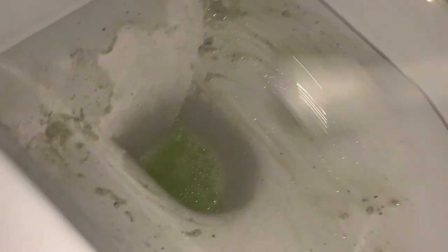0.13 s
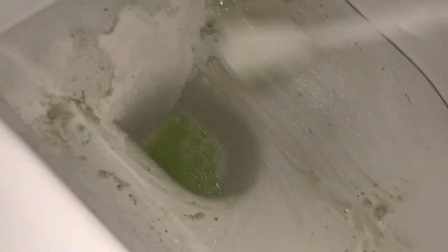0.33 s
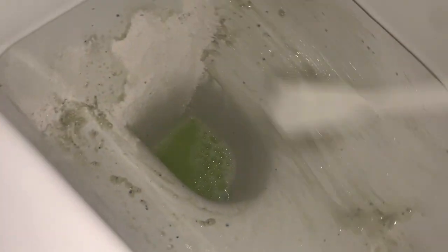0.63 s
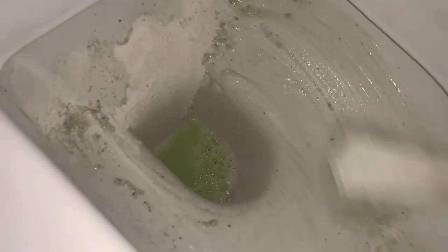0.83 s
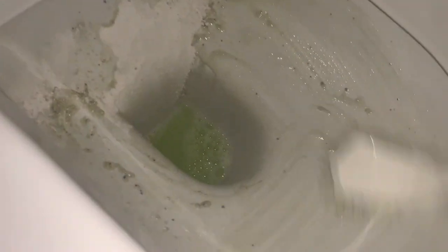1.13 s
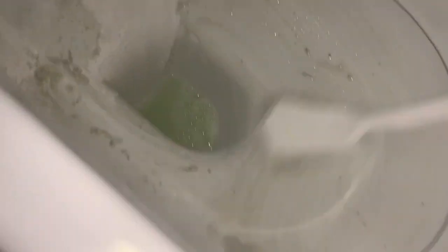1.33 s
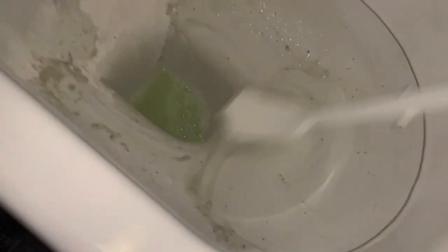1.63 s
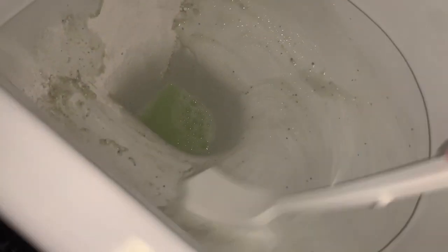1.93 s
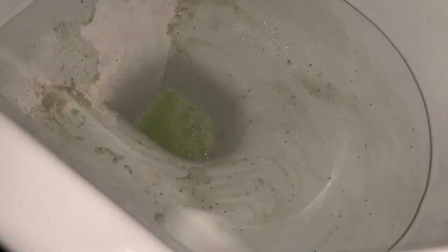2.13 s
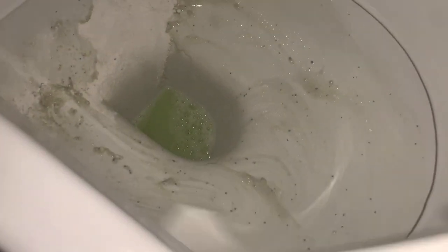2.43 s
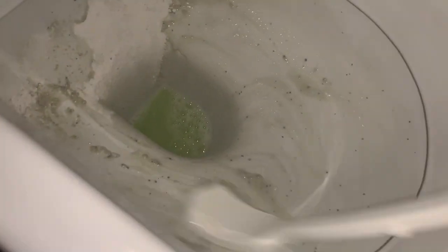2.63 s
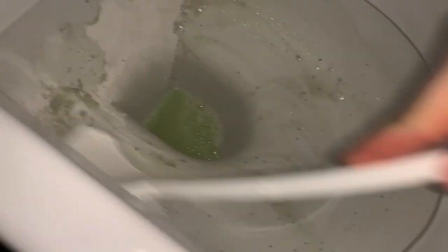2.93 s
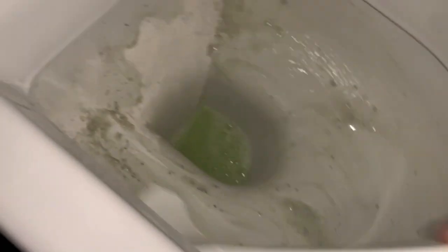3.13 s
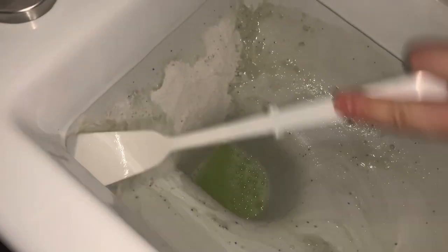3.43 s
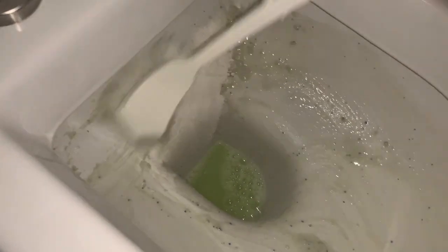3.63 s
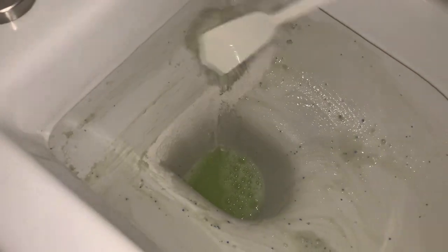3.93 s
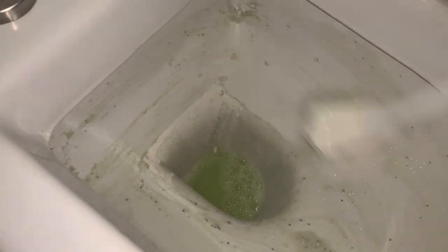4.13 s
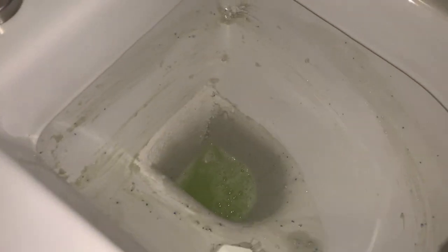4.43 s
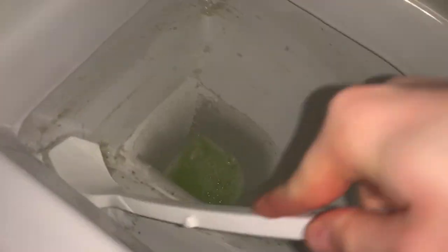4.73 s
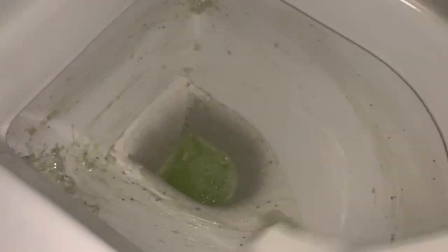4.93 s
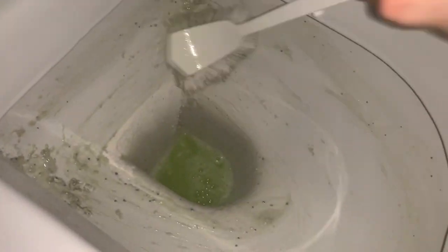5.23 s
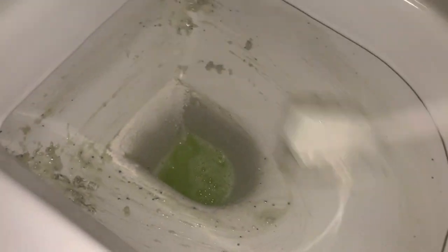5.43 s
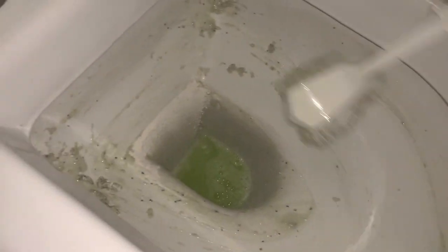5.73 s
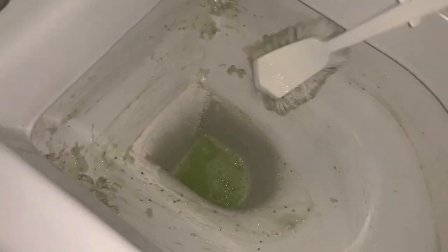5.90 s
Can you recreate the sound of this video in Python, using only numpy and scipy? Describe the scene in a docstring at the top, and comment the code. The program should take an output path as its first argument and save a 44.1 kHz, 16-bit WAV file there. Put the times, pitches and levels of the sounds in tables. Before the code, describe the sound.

Close, bright bristle strokes rasp over powdery porcelain, brisk at first, then softer and slower, with hollow bowl resonance and sharp plastic knocks.

```python
"""In a wet, powdered toilet bowl a stiff plastic brush scrubs back and forth, close to a two-port microphone.
Bristle tips hiss over the glaze and grit scrapes under them: both are streams of tiny random clicks.
The hollow of the bowl drones along as a set of ringing air modes. Now and then the brush head knocks
or bumps the porcelain (short rings and soft pushes), and it squeaks on the glaze (gliding tones).
Reflections in the bowl and a tiled room surround the brush, over a low rumble."""
import sys
import numpy as np
from scipy import signal
from scipy.fft import rfft, irfft, next_fast_len
from scipy.io import wavfile

SR = 44100
rng = np.random.default_rng(int(sys.argv[2]) if len(sys.argv) > 2 else 0)


def file_out(sig):
    """Save sig as 16-bit WAV at sys.argv[1]."""
    # one column per channel
    cols = np.atleast_2d(sig).T
    # limit, then scale
    lim = np.clip(cols, -1, 1)
    pcm = np.round(lim * 32767).astype(np.int16)
    wavfile.write(sys.argv[1], SR, pcm)


N = 267466
TIME = np.arange(N) / SR  # seconds

# how the sound of scraped grit is spread over pitch: [f/Hz, relative level/dB]
GRIT_SPECTRUM = [(480, -24.5), (800, -15.5), (1300, -7), (1900, -2.5), (3000, -3), (4200, 0), (5600, -2.5),
                 (7500, -1), (15500, -5)]


def amp(db):
    """Turns decibels into a factor."""
    return 10 ** (np.asarray(db) / 20)


def unit(x):
    """Scales a sound to rms 1."""
    return x / np.sqrt(np.mean(x ** 2) + 1e-20)


def read(points, hz):
    """Reads a table of (f/Hz, value), joined by straight lines in log frequency."""
    f, value = np.transpose(points)
    return np.interp(np.log(hz + 1), np.log(f), value)


def curve(rows, axis):
    """One column of a table at every sample; column 0 is the time in seconds."""
    rows = np.array(rows)
    return np.interp(TIME, rows[:, 0], rows[:, axis])


def add(mix, s, sound):
    """Adds a short sound to the mix, starting at s seconds."""
    part = mix[round(s * SR):][:len(sound)]
    part += sound[:len(part)]


def colour(x, spectrum):
    """Filters x by a spectrum, then scales it to rms 1."""
    gain = amp(read(spectrum, np.fft.rfftfreq(N, 1 / SR)))
    return unit(irfft(rfft(x) * gain, N))


def wander(hz):
    """A smooth random curve of rms 1 that moves mostly slower than hz."""
    count = 8 * int(hz * N / SR)
    smooth = signal.lfilter(*signal.butter(2, 1 / 4), rng.standard_normal(count))
    return unit(np.interp(TIME, np.linspace(0, N / SR, count), smooth))


def slips(per_s, spread_db):
    """Tiny random clicks of uneven size, at rms 1."""
    size = amp(spread_db * np.minimum(rng.exponential(1, N), 4))
    sign = rng.choice([-1, 1], N)
    happens = rng.random(N) < per_s / SR
    return unit(size * sign * happens)


def ring(modes, t):
    """Dying sines, one row a mode; a mode falls by 60 dB in its t60."""
    return np.array([amp(db - 60 * t / t60) * np.sin(2 * np.pi * hz * t) for hz, t60, db in modes])


def room_tone(level_db=-64, sway_db=4.0):
    """A low, uneven rumble in the room, made of filtered noise."""
    # spectrum of the rumble: [f/Hz, relative level/dB]
    rumble_spectrum = [(24, -56), (45, -9), (70, -7), (110, -23.5), (290, -22), (540, -31.5), (900, -38),
                       (15000, -32.5)]
    rumble = colour(rng.standard_normal(N), rumble_spectrum)
    return rumble * amp(level_db + sway_db * wander(hz=20))


def echoes(t60s):
    """Sparse reflections of random sign, each band dying at its own speed from equal energy per band."""
    taps = rng.choice([-1., 1.], SR // 2) * (rng.random(SR // 2) < 1 / 8)
    hz, t, bands = signal.stft(taps, SR, nperseg=128)
    fade = amp(-60 * t / read(t60s, hz)[:, None])
    fade /= np.linalg.norm(fade, axis=1, keepdims=True)
    tail = signal.istft(bands * fade, SR, nperseg=128)[1]
    return tail / np.linalg.norm(tail)


def reflections(x, t60s, count):
    """The brush keeps moving, so its sound shifts between several sets of reflections."""
    share = np.array([wander(hz=22) for _ in range(count)])
    share /= np.linalg.norm(share, axis=0)
    return sum(signal.oaconvolve(x * part, echoes(t60s))[:N] for part in share)


def space(x, bowl_t60=0.098, room_db=-14, lead_s=0.000208, lead_from_hz=6250):
    """Direct sound, quick reflections round the bowl and a tiled room; in the treble the right port leads."""
    # how long the tiled room rings: [f/Hz, t60/s]
    room_t60 = [(300, 1), (6000, 0.088), (15000, 0.046)]
    # share of the sound that comes straight to the ports: [f/Hz, share from 0 to 1]
    direct_share = [(120, .78), (280, .88), (500, .7), (1000, .72), (2500, .45), (5200, .36), (6800, .8),
                    (8500, .97), (15000, .955)]
    size = next_fast_len(N + SR // 10)
    hz = np.fft.rfftfreq(size, 1 / SR)
    direct = np.clip(read(direct_share, hz), 0, 1)
    lead = np.exp(2j * np.pi * lead_s * np.maximum(hz - lead_from_hz, 0))
    heard = x + amp(room_db) * reflections(x, room_t60, count=2)
    straight = direct * rfft(heard, size)
    out = []
    for port_shift in (1, lead):  # left, right
        bowl = reflections(heard, [(1, bowl_t60)], count=5)
        scattered = np.sqrt(1 - direct ** 2) * rfft(bowl, size)
        out.append(irfft(straight * port_shift + scattered, size)[:N])
    return np.array(out)


def hollow(x):
    """The air in the bowl rings when x stirs it."""
    # air modes of the bowl: [f/Hz, t60/s, relative height of the resonance/dB]
    air_modes = [(77.5, 0.16, 9.5), (183, 0.38, 5), (297.6, 1, 5), (408, 0.45, 6), (682, 0.16, -15),
                 (826, 0.048, 10.5), (970, 0.066, 4), (1161, 0.039, 9), (1535, 0.015, 3.5),
                 (1808, 0.037, 8.5)]
    t = np.arange(SR // 2) / SR
    # a long ring builds up higher, so divide by t60 to get the listed heights
    response = (ring(air_modes, t) / np.array(air_modes)[:, 1:2]).sum(0)
    return signal.fftconvolve(x, response / abs(rfft(response)).max())[:N]


def squeaks(jitter=.022, second_db=-1, third_db=-7, grip_db=-35, chatter_hz=150, chatter_db=2.8):
    """Fast, unsteady stick-slip on the glaze: a gliding, chattering tone with two overtones."""
    # one table for each squeak: [t/s, f/Hz, level/dB]
    glides = [
        [(2.105, 985, -50), (2.13, 970, -42), (2.17, 955, -55)],
        [(3.59, 1980, -47), (3.645, 1945, -42), (3.675, 1880, -47)],
        [(4.416, 3400, -40), (4.431, 3250, -36), (4.452, 4300, -32), (4.467, 3600, -35), (4.479, 5500, -35),
         (4.485, 4700, -48)],
        [(4.465, 3300, -45), (4.476, 3700, -40), (4.492, 4400, -48)],
    ]
    out = np.zeros(N)
    for rows in glides:
        level_db = curve(rows, axis=2)
        # a harder grip lets go more sharply and less evenly; it is full from grip_db up
        grip = np.minimum(amp(level_db - grip_db), 1)
        pitch_hz = curve(rows, axis=1) * (1 + jitter * grip * wander(hz=902))
        turn = 2 * np.pi * np.cumsum(pitch_hz) / SR
        overtones = amp(second_db) * np.sin(2 * turn) + amp(third_db) * np.sin(3 * turn)
        tone = np.sin(turn) + grip * overtones
        sliding = (TIME > rows[0][0]) & (TIME < rows[-1][0])
        # a hard squeak catches and lets go in quick bursts
        burst_hz = chatter_hz * (1 + .1 * wander(hz=60))
        chatter = np.sin(2 * np.pi * np.cumsum(burst_hz) / SR) - .5
        out += tone * sliding * amp(level_db + chatter_db * grip * chatter + 0.57 * wander(hz=198.5))
    return out


def drag(start_s=3.27, length_s=0.27, pitch_hz=1840, width_hz=210, level_db=-51):
    """A slow drag that nearly squeaks: the bristles slip almost in step, a fuzzy band of tone."""
    resonance = signal.iirpeak(pitch_hz, pitch_hz / width_hz, fs=SR)
    fuzz = signal.lfilter(*resonance, rng.standard_normal(N))
    swell = np.sin(np.pi * np.clip((TIME - start_s) / length_s, 0, 1))
    return unit(fuzz) * np.sqrt(abs(swell)) * amp(level_db)


def bumps(cycles=.7, shortest_s=.004, rattle_db=-11, rattle_s=.04):
    """Bristles bottom out: a soft push with a quickly dying shudder under it; both set the hollow booming."""
    # the soft bumps: [t/s, level/dB, f of the push/Hz]
    bump_list = [(0.213, -42, 440), (1.208, -48, 92), (1.472, -43, 668), (1.489, -54, 74.5),
                 (1.657, -49, 67), (1.795, -48.5, 668), (2.107, -47, 690), (2.1286, -52, 178),
                 (2.18, -51, 178), (3.31, -54, 178), (3.772, -40, 277), (3.785, -44, 71), (4.624, -43, 930),
                 (4.629, -40, 300), (4.636, -39, 177), (4.667, -45, 185), (4.690, -43.5, 82),
                 (6.008, -39, 390), (6.012, -46, 180)]
    out, t = np.zeros(N), np.arange(SR // 5) / SR
    for s, db, hz in bump_list:
        u = t / max(cycles / hz, shortest_s)  # 1 at the peak of the push
        push = u * np.exp(1 - u) * np.sin(2 * np.pi * hz * t)
        # the shudder is noise one octave wide
        band = signal.butter(2, [hz / np.sqrt(2), hz * np.sqrt(2)], "band", fs=SR, output="sos")
        shudder = unit(signal.sosfilt(band, rng.standard_normal(len(t)))) * np.exp(-t / rattle_s)
        add(out, s, amp(db) * (push + amp(rattle_db) * shudder))
    return out + hollow(out)


def knocks(crack_s=0.0017, crack_db=-3, ring_db=-13, low_share=0.17, tick_db=6.5, tick_hz=5600,
           tick_s=0.000096):
    """Hard plastic on porcelain: tick, crack and short ring, lower and duller if the bristles cushion it."""
    # the head knocks on the bowl: [t/s, level/dB, brightness as upper limit f/Hz]
    knock_list = [(0.2088, -15.5, 10500), (1.2105, -26, 7000), (1.4352, -22.5, 7000), (2.1067, -25, 1410),
                  (3.7682, -18, 6000), (4.627, -23, 1300), (5.066, -27, 10000), (5.762, -29.5, 1290),
                  (6.004, -17, 3000), (6.0094, -13, 1250), (6.046, -25, 5500)]
    # ring of the brush head on porcelain: [f/Hz, t60/s, relative level/dB]
    head_modes = [(658, 0.057, -7), (976, 0.058, -8), (1900, 0.013, -2.5), (2663, 0.045, -1.5),
                  (3255, 0.015, 5), (4530, 0.017, -3), (6050, 0.011, -44), (6740, 0.011, -2)]
    out, t = np.zeros(N), np.arange(SR // 5) / SR
    tick = t / tick_s * np.exp(1 - t / tick_s) * np.sin(2 * np.pi * tick_hz * t)
    head_ring = ring(head_modes, t).sum(0)
    for s, db, bright_hz in knock_list:
        crack = rng.choice([-1, 1], len(t)) * np.exp(-t / crack_s)
        blow = amp(tick_db) * tick + amp(crack_db) * crack + amp(ring_db) * head_ring
        cushioned = signal.lfilter(*signal.butter(2, min(bright_hz, SR / 3), fs=SR), blow)
        low_cut = signal.butter(1, low_share * bright_hz, "high", fs=SR)
        add(out, s, amp(db) * signal.lfilter(*low_cut, cushioned))
    return out


def stroking(layer):
    """Level of one layer ("hiss", "grit" or "stir") as the strokes follow one another."""
    # one row for each push or pull: [start t/s, length/s, bristle hiss level/dB, grit scrape level/dB,
    # stir of the bowl's hollow level/dB, lean/dB = how much harder the hand presses at the end than the start]
    strokes = [(-0.078, 0.15, -24.5, -34, -48.5, 5.5), (0.031, 0.19, -27, -42, -53, 7),
               (0.186, 0.21, -25.0, -33.5, -49, -5), (0.367, 0.19, -24.5, -35.5, -55, -2),
               (0.521, 0.21, -26, -33, -51.5, -2.5), (0.686, 0.34, -26, -36.5, -53, 12.5),
               (0.966, 0.15, -27.5, -35, -52, -4), (1.059, 0.18, -24.5, -41.5, -66, -11),
               (1.136, 0.35, -31.5, -35.5, -58.5, -19.5), (1.379, 0.22, -26.5, -33, -52.5, 9),
               (1.53, 0.33, -30, -36, -59, -14), (1.7, 0.21, -29.5, -35, -57, 18.5),
               (1.844, 0.26, -33.5, -36.5, -55, -8), (2.007, 0.14, -26.5, -35.5, -72, 24),
               (2.062, 0.2, -31.5, -35.5, -50, 2), (2.218, 0.17, -31.5, -35.5, -54, -7),
               (2.318, 0.23, -29.5, -34, -54.5, 9.5), (2.519, 0.21, -31.0, -35.5, -56.5, -13),
               (2.672, 0.23, -27.5, -32, -58.5, -1.5), (2.867, 0.21, -32, -39.5, -62, 0),
               (3.047, 0.24, -29.5, -34.5, -56, -5), (3.235, 0.34, -38.5, -43, -54, -10.5),
               (3.498, 0.33, -39, -43.5, -58.5, 14), (3.795, 0.24, -36, -43.0, -53, -13),
               (3.957, 0.27, -38.5, -47, -62, 7), (4.101, 0.3, -37.5, -41, -56.5, 7.5),
               (4.315, 0.28, -49, -46, -57.5, -15), (4.476, 0.18, -35.5, -43, -56.5, 10),
               (4.707, 0.48, -35, -42, -57, 7.5), (5.06, 0.22, -33.5, -44, -57, 12),
               (5.271, 0.29, -32.5, -42.5, -65, 0), (5.562, 0.32, -33, -38.5, -59, 3),
               (5.84, 0.27, -34.5, -43, -58, 18)]
    # each stroke gathers speed and brakes before the turn; in mid-stroke the hand is faster by arch_db
    speed_up_s, brake_s, arch_db = .104, .045, 6.5
    # how a layer follows the hand: level column, power of the speed, share of the lean, and
    # the level in dB at which the bent bristles still creep between strokes;
    # pressing feeds the grit and damps the hiss
    column, speed_power, lean_share, creep_db = {
        "hiss": (0, 1, -0.1, -53.5),
        "grit": (1, 0.65, 1, -57.5),
        "stir": (2, 0.31, 1, -72.5)}[layer]
    power = np.full(N, amp(creep_db) ** 2)
    for start, length, *layer_db, lean_db in strokes:
        inside = (TIME > start) & (TIME < start + length)
        t = TIME[inside] - start
        from_middle = t / length - .5
        ramps = np.minimum([t / speed_up_s, (length - t) / brake_s], 1)
        speed = np.prod(np.sin(np.pi / 2 * ramps) ** 2, axis=0)
        speed = speed * amp(-arch_db * (2 * from_middle) ** 2)
        press_db = lean_share * lean_db * from_middle
        power[inside] += (speed ** speed_power * amp(layer_db[column] + press_db)) ** 2
    return np.sqrt(power)


def flicks(level_db=-17):
    """A steady, sparse crackle of tiny snaps runs along with the scraping."""
    snaps = colour(slips(per_s=34, spread_db=4.5), GRIT_SPECTRUM)
    return snaps * stroking("grit") * amp(level_db)


def bites(peak_s=0.019):
    """At a turn the bristles flip over and bite into the powder: a coarse crunch swells and dies."""
    # the bites: [t/s, level/dB]
    bite_list = [(0.238, -30.5), (0.566, -30.5), (1.16, -39), (3.09, -34), (3.865, -43)]
    dig = np.zeros(N)
    u = np.arange(SR // 5) / SR / peak_s
    for s, db in bite_list:
        add(dig, s, amp(db) * u * np.exp(1 - u))
    return colour(slips(per_s=1800, spread_db=4.0), GRIT_SPECTRUM) * dig


def scrubbing():
    """Thousands of bristle tips slip each second; tufts catch together, and grit crunches under them."""
    # spectrum of the bristle hiss: [f/Hz, relative level/dB]
    hiss_spectrum = [(700, -71), (3000, -8.5), (5000, -12), (6500, -5), (8300, -1.5), (11000, 2.5),
                     (15500, 0.5)]
    tufts, patches = wander(hz=129.2), wander(hz=16)  # the powder lies in patches
    tips = colour(slips(per_s=15000, spread_db=0.0), hiss_spectrum)
    hiss = tips * stroking("hiss") * amp(0.68 * tufts + 0.13)
    grains = colour(slips(per_s=9000, spread_db=2.5), GRIT_SPECTRUM)
    grit = grains * stroking("grit") * amp(0.11 * tufts + 0.86 * patches + 0.12)
    boom = unit(hollow(slips(per_s=1400, spread_db=3.5)))
    drone = boom * stroking("stir") * amp(0.85 * patches - 2.0)
    return hiss + grit + drone


def scene():
    """All the brush sounds and the room's rumble, heard at the two ports."""
    brush = scrubbing() + bites() + drag() + flicks() + knocks() + bumps() + squeaks()
    # the bounce off the near wall thins one low band of all the brush sound
    wall_null_hz = 538
    brush = signal.lfilter(*signal.iirnotch(wall_null_hz, Q=1.9, fs=SR), brush)
    return space(brush + room_tone())


def record(dry, edge_hz=15780):
    """Each port has its own colour; then a steep filter removes what lies above edge_hz."""
    # left minus right level at the ports: [f/Hz, level difference/dB]
    port_tilt = [(100, 1), (550, 3), (1200, 1.5), (3200, 1), (5400, -4), (7000, 0)]
    half_db = read(port_tilt, np.fft.rfftfreq(N, 1 / SR)) / 2
    ports = irfft(rfft(dry) * amp([half_db, -half_db]), N)
    band_limit = signal.firwin(801, edge_hz, window=("kaiser", 9), fs=SR)
    return signal.oaconvolve(ports, band_limit[None], "same")


dry = scene()
out = record(dry)
file_out(out)
```